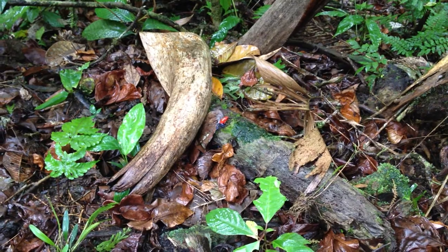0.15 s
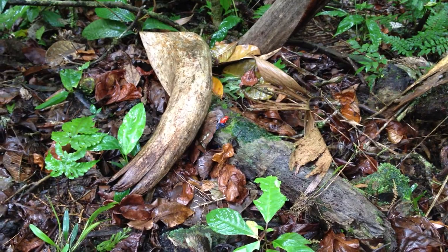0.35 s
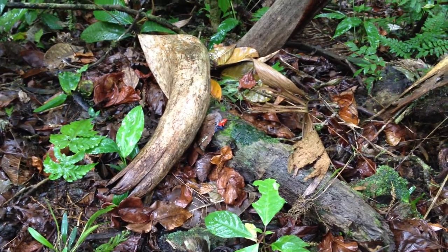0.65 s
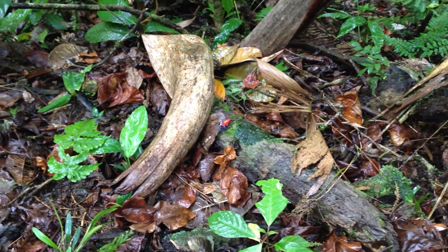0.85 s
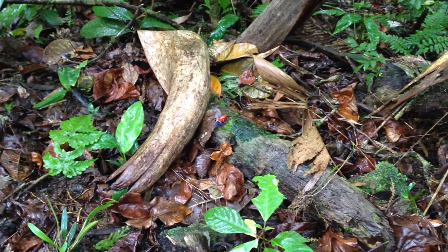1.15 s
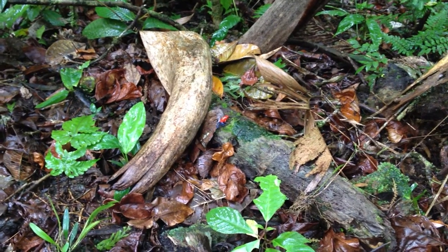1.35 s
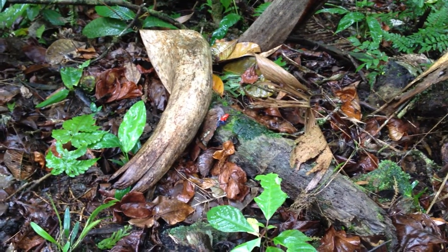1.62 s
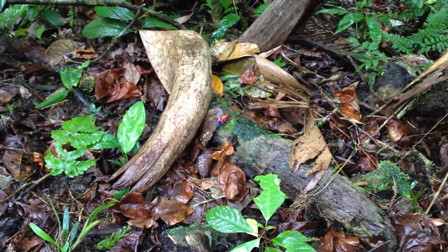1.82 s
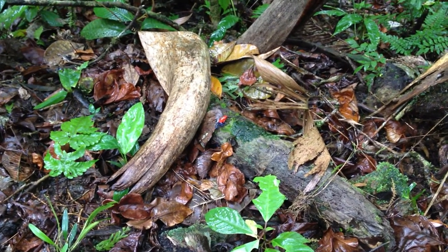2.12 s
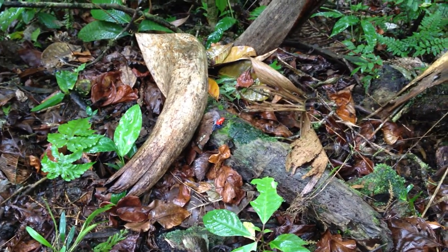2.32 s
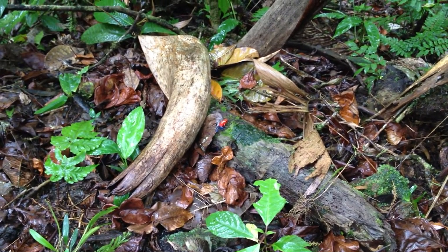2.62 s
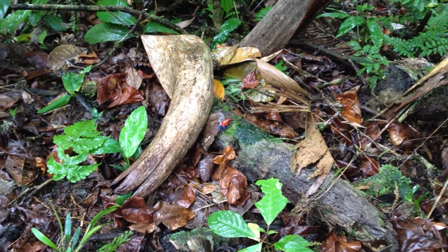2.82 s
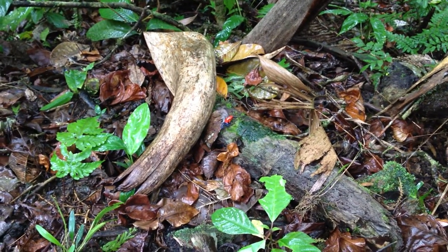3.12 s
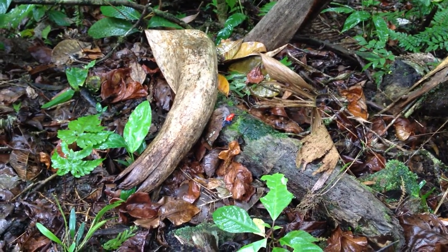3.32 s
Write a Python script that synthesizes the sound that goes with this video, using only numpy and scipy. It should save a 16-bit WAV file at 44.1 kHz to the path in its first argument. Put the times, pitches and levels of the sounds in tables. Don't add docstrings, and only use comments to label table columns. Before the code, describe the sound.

Rapid, even frog buzzes run throughout on a damp forest floor, with a brief woody echo. Rain hisses softly far off while drops tick, tap and thud nearby; two louder splats land early and late.

```python
import sys
import numpy as np
from scipy import signal
from scipy.fft import rfft, irfft, next_fast_len
from scipy.io import wavfile
from scipy.ndimage import uniform_filter1d, map_coordinates

SR = 44100
rng = np.random.default_rng(int(sys.argv[2]) if len(sys.argv) > 2 else 0)


def unload_wav(signal):
    wavfile.write(
        sys.argv[1],
        SR,
        np.round(np.clip(np.atleast_2d(signal).T, -1, 1) * 32767).astype(np.int16),
    )


def ratio(d):
    e = np.asarray(d, float) / 20
    return 10 ** e


N = 152586


def unit(x):
    return x / np.sqrt(np.mean(x ** 2) + 1e-20)


def wobble(rate_hz, size=N):
    knots = rng.standard_normal(int(size * 400 / SR) + 4)
    return map_coordinates(knots, [np.arange(size) * min(rate_hz, 399) / SR])


def filtered(x, response):
    m = next_fast_len(len(x) + 4096)
    return irfft(rfft(x, m) * response(np.fft.rfftfreq(m, 1 / SR)), m)[:len(x)]


def peak(f, hz, width_hz):
    return 1j * f * width_hz / (hz * hz - f * f + 1j * f * width_hz + 1e-9)


def rush(spectrum, patchy_db):
    z = signal.stft(rng.standard_normal(N), nperseg=512)[2]
    field = uniform_filter1d(rng.standard_normal(z.shape), 12, 0)
    field = uniform_filter1d(field, 6, 1)
    x = signal.istft(z * ratio(patchy_db * unit(field)), nperseg=512)[1][:N]
    f, db = np.transpose(spectrum)
    return unit(filtered(x, lambda hz: ratio(np.interp(np.log(hz + 1), np.log(f), db))))


def drops(rows, broad, gain_db):
    snap, lag_s = 1.9, .0006
    out, t = np.zeros(N + SR), np.arange(2048) / SR
    noises = rng.standard_normal((len(rows), len(t)))
    for (s, db, hz, t60), noise in zip(rows, noises):
        push = noise * ratio(-60 * t / t60) + snap * np.sqrt(SR / hz) * (t == 0)
        puff = filtered(push, lambda f: peak(f, hz, broad * hz) ** 2)
        out[round((s + lag_s) * SR):][:len(t)] += ratio(db + gain_db) * puff / np.abs(puff).max()
    return out[:N]


def scatter(per_s, db, spread_db, hz, octaves, t60):
    u = rng.random((int(per_s * N / SR), 4))
    start_s = u[:, 0] * N / SR
    size_db = db - spread_db * np.log(1 - .97 * u[:, 1])
    centre_hz = np.clip(hz * 2 ** (octaves * (2 * u[:, 2] - 1)), 100, 15000)
    return np.c_[start_s, size_db, centre_hz, t60 * 4 ** u[:, 3]]


def rain():
    # frequency in Hz, density in dB per Hz.
    hiss_spectrum = [(25, -20), (70, -13), (170, 1), (320, -0.5), (900, 1.5), (1800, -1), (2800, -7.5),
                     (15400, -39)]
    # frequency in Hz, density in dB per Hz.
    spray_spectrum = [(1500, -23), (3000, -3), (4500, -3.5), (5050, -7), (8400, -8), (9400, -15),
                      (12500, -14), (15400, -22.5)]
    swell_db = .35 * wobble(3.05)
    hiss = ratio(-50.5 + swell_db + 0.7 * wobble(11)) * rush(hiss_spectrum, patchy_db=0.34)
    spray = ratio(-54 + swell_db + 0.87 * wobble(14)) * rush(spray_spectrum, patchy_db=1.55)
    patter_rows = scatter(120, db=-55.5, spread_db=2.5, hz=848, octaves=1.73, t60=0.011)
    fizz_rows = scatter(90, db=-58, spread_db=3.5, hz=9000, octaves=0.78, t60=.008)
    patter = drops(patter_rows, broad=0.72, gain_db=-3.5)
    fizz = drops(fizz_rows, broad=.9, gain_db=0.7)
    return hiss + spray + patter + fizz


def insects():
    # centre in Hz, width in Hz, level in dB.
    choruses = [
        (5993, 75, -73.5),
        (6230, 260, -68),
        (3210, 80, -75),
    ]
    trill_hz, trill_db, gain_db = 92.5, 1, 4
    bands = []
    for hz, width_hz, db in choruses:
        band = filtered(rng.standard_normal(N), lambda f: peak(f, hz, width_hz) ** 2)
        bands.append(unit(band) * ratio(db + gain_db))
    return sum(b * ratio(trill_db * wobble(trill_hz) + 0.41 * wobble(3.14)) for b in bands)


def wood_echo(voice):
    t60_s, level_db, delay_s = 0.34, -3.5, .008
    decay = ratio(-60 * np.arange(SR // 2) / SR / t60_s)
    tail = rng.standard_normal(SR // 2) * decay
    delayed = np.pad(voice, (round(delay_s * SR), 0))
    echo = signal.fftconvolve(delayed, tail / np.linalg.norm(tail))
    return ratio(level_db) * echo[:len(voice)]


def frog():
    # middle of the call in seconds, level in dB.
    calls = [(0.127, -48), (0.316, -49), (0.5, -48.5), (0.692, -49), (0.881, -48.5), (1.071, -49),
             (1.252, -48), (1.447, -47), (1.63, -48.5), (1.822, -48), (2.01, -48), (2.201, -51),
             (2.383, -48.5), (2.568, -49.5), (2.757, -50), (2.945, -50), (3.138, -50.5), (3.329, -49)]
    # centre in Hz, width in Hz, gain in dB.
    sac_modes = [
        (4062, 840, 2),
        (4610, 155, 7.5),
    ]
    period_s, gain_db = .189, 2
    tone_hz, detune_hz, wander_hz, climb_hz_per_s = 4062, 16, 35, 900
    start_hz, top_hz, quicken_s, quicken_at_s = 182.3, 284.2, .012, -0.0234
    rise_s, fall_s, peak_at_s, effort_shape = 0.024, 0.019, 0.0013, 1.68
    scatter_db, alternate_db, jitter, sharpness = 2, 1.6, .05, 1.8
    slip_rad, alternate_slip_rad, rasp = .45, .4, .27

    lead, t = SR // 4, np.arange(SR // 5) / SR - .1
    voice = np.zeros(N + SR)
    flank_s = np.where(t < peak_at_s, rise_s, fall_s)
    effort = np.exp(-.5 * np.abs((t - peak_at_s) / flank_s) ** effort_shape)
    rate = start_hz + (top_hz - start_hz) / (1 + np.exp((quicken_at_s - t) / quicken_s))
    earlier_call = (calls[0][0] - period_s, calls[0][1])
    for s, db in [earlier_call] + list(calls):
        beat = np.cumsum(rate * (1 + jitter * wobble(61.7, size=len(t)))) / SR + rng.random()
        which = beat.astype(int)
        sign = (-1.) ** which
        size_db = scatter_db * rng.standard_normal(128)[which] + alternate_db * sign
        gate = np.abs(np.sin(np.pi * beat)) ** (2 * sharpness) * ratio(size_db)
        hz = tone_hz + detune_hz * rng.standard_normal() + climb_hz_per_s * t
        hz = hz + wander_hz * wobble(79.3, size=len(t))
        slip = slip_rad * rng.standard_normal(128)[which] + alternate_slip_rad * sign
        tone = np.sqrt(2) * np.sin(2 * np.pi * np.cumsum(hz) / SR + slip)
        tone = tone + rasp * 4 * rng.standard_normal(len(t))
        sound = filtered(gate * tone, lambda f: sum(ratio(g) * peak(f, c, w) ** 2 for c, w, g in sac_modes))
        voice[round((s + t[0]) * SR) + lead:][:len(t)] += ratio(db + gain_db) * effort * unit(sound)
    return (voice + wood_echo(voice))[lead:][:N]


def taps():
    # start in seconds, peak level in dB, centre in Hz, decay time T60 in seconds.
    tap_rows = [(.1174, -40, 1610, 0.033), (.4165, -35, 1880, .015), (.5447, -32.5, 1800, 0.015),
                (.5505, -30.5, 2220, 0.022), (1.1124, -31.5, 2300, 0.037), (1.28, -38.5, 1660, 0.15),
                (1.5158, -36, 1500, 0.13), (1.663, -38, 1500, 0.035), (1.8424, -36, 1400, .1),
                (2.266, -35.5, 1560, 0.086), (.955, -39, 1700, 0.2), (2.5, -46, 5600, .1),
                (2.372, -35, 1500, 0.072), (2.5735, -39, 1480, 0.039), (2.8812, -34, 3600, 0.011),
                (2.9048, -29.5, 4600, 0.0091), (3.1358, -34.5, 1110, 0.071), (3.06, -44, 1300, 0.081),
                (3.2824, -37, 6300, 0.018), (.008, -39, 1500, 0.15), (1.975, -40, 1150, .05)]
    return drops(tap_rows, broad=1.0, gain_db=0.7)


def ticks():
    # start in seconds, peak level in dB, centre in Hz, decay time T60 in seconds.
    tick_rows = [(.0812, -37, 10000, .02), (.18, -36.5, 10900, .1), (.2788, -33.5, 9000, 0.037),
                 (.3217, -32.5, 8400, .01), (.416, -29, 9500, .012), (.4275, -40, 11500, .015),
                 (.7238, -34, 9000, 0.045), (.9595, -39, 13000, .02), (1.11, -42, 8500, 0.15),
                 (1.1997, -34, 13500, 0.054), (1.2595, -33.5, 10000, .015), (1.509, -43, 13500, .015),
                 (1.6566, -34.5, 11800, 0.033), (1.7215, -32, 11000, 0.02), (1.8335, -39, 13500, .015),
                 (1.869, -36, 12500, .02), (1.8931, -38, 13000, .12), (2.1046, -46, 8000, .02),
                 (2.2902, -35, 11600, 0.027), (2.553, -33, 12500, .03), (2.5621, -34, 12200, 0.15),
                 (2.6952, -33, 6500, 0.035), (2.8469, -30.5, 10000, .015), (2.8809, -30.5, 8500, .015),
                 (2.9046, -28.5, 11800, .015), (3.1368, -33.5, 11500, 0.038), (3.211, -44, 13000, .012),
                 (3.2171, -28, 10500, 0.013), (3.2824, -41, 12500, 0.045), (3.4027, -42, 9400, .012)]
    return drops(tick_rows, broad=1.0, gain_db=-6.0)


def thuds():
    # start in seconds, peak level in dB, centre in Hz, decay time T60 in seconds.
    thud_rows = [(.415, -44, 337, 0.054), (.452, -38.5, 625, .06), (.544, -40, 407, .06),
                 (.658, -43.5, 305, .06), (.885, -39, 337, 0.028), (1.627, -39.5, 970, 0.066),
                 (1.805, -45, 292, 0.056), (1.845, -40.5, 220, 0.047), (2.197, -43, 218, 0.12),
                 (2.359, -43.5, 231, 0.12), (2.405, -37.5, 860, 0.11), (3.136, -41, 293, 0.072)]
    return drops(thud_rows, broad=.6, gain_db=-3)


def splats():
    # start in seconds, peak level in dB.
    impacts = [
        (.4633, -26.5),
        (2.7451, -28.5),
    ]
    # centre in Hz, width in Hz, gain in dB.
    first_leaf = [(1500, 900, -11), (2500, 140, 0), (3200, 190, -6), (6400, 550, -8.5), (7500, 900, -9.5),
                  (11800, 2500, -24)]
    # centre in Hz, width in Hz, gain in dB.
    second_leaf = [(1700, 660, -3), (2300, 640, 3.5), (3182, 840, 0), (3940, 420, -1.5), (6100, 960, -4.5),
                   (7620, 1200, -3), (11500, 4000, -21)]
    burst_s, tail_db, tail_t60_s, gain_db = .0016, -12, .035, 5.5
    out, t = np.zeros(N + SR), np.arange(2048) / SR
    envelope = np.maximum(t < burst_s, ratio(tail_db - 60 * t / tail_t60_s))
    for (s, db), leaf in zip(impacts, (first_leaf, second_leaf)):
        burst = np.sign(rng.standard_normal(len(t))) * envelope

        def modes(f):
            return sum((-1) ** k * ratio(g) * peak(f, c, w) for k, (c, w, g) in enumerate(leaf))

        hit = filtered(burst, modes)
        out[round(s * SR):][:len(t)] += ratio(db + gain_db) * hit / np.abs(hit).max()
    return out[:N]


def scene():
    drips = taps() + ticks() + thuds() + splats()
    return (rain() + insects() + frog() + drips)[None]


def low_pass(x):
    return signal.sosfilt(signal.butter(12, 16430, fs=SR, output="sos"), x)


def record(dry):
    low_hz, top_hz = 119, 15450
    mic = lambda f: (1j * f / (low_hz + 1j * f)) ** 2 * (f < top_hz)
    return low_pass(filtered(dry[0], mic)[None])


dry = scene()
out = record(dry)
unload_wav(out)
```